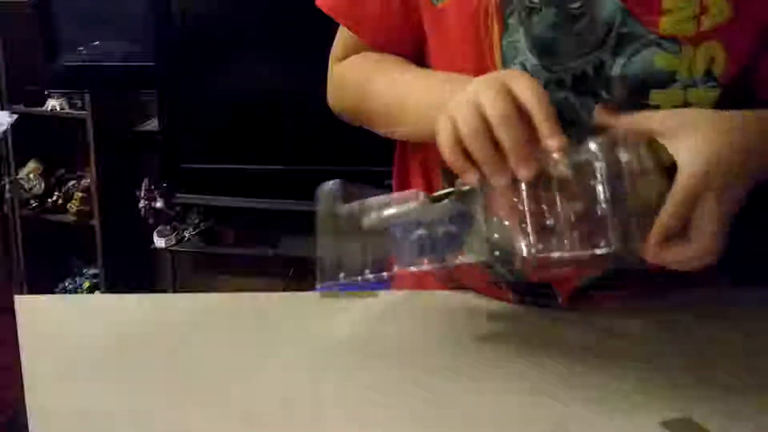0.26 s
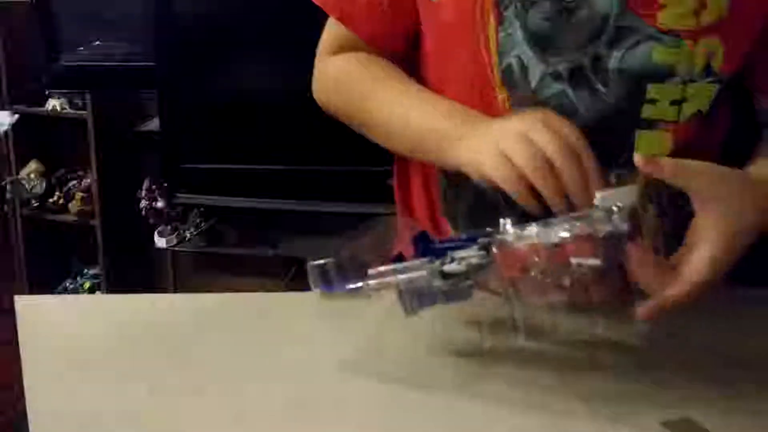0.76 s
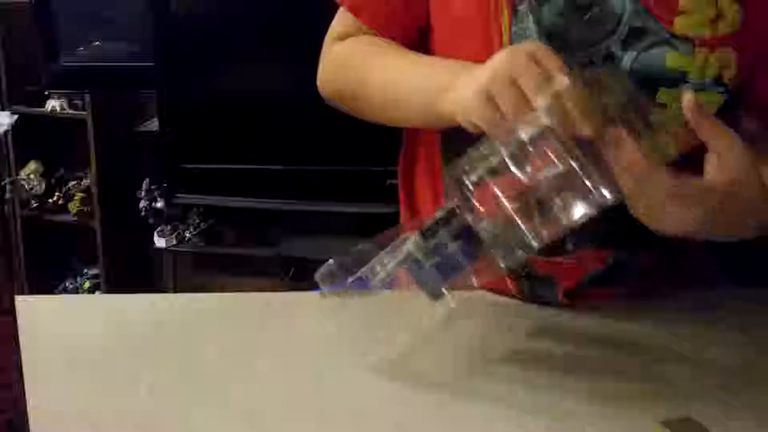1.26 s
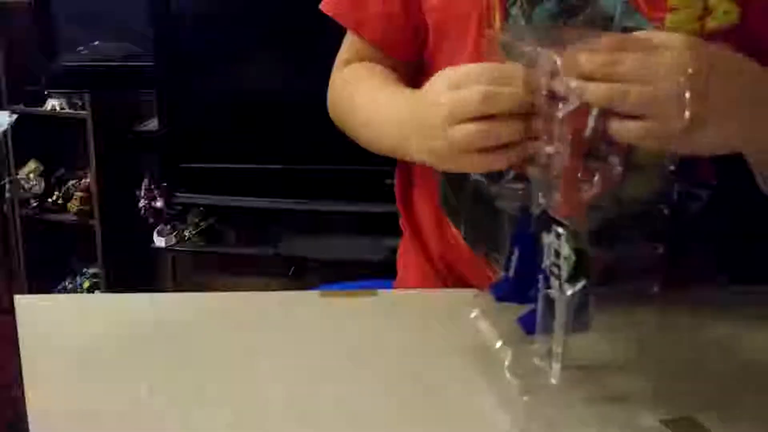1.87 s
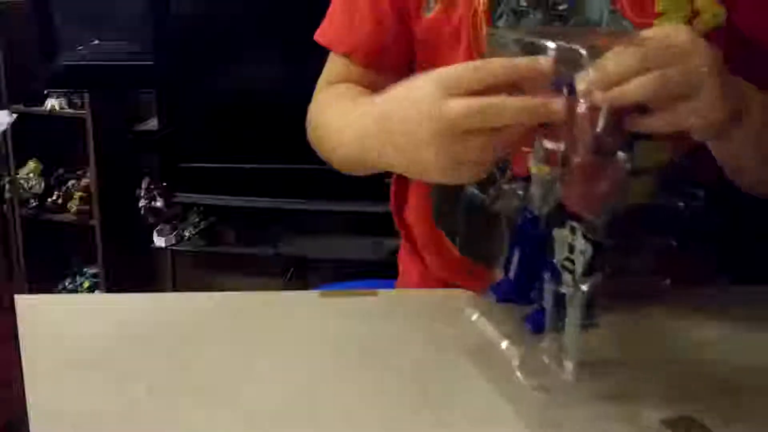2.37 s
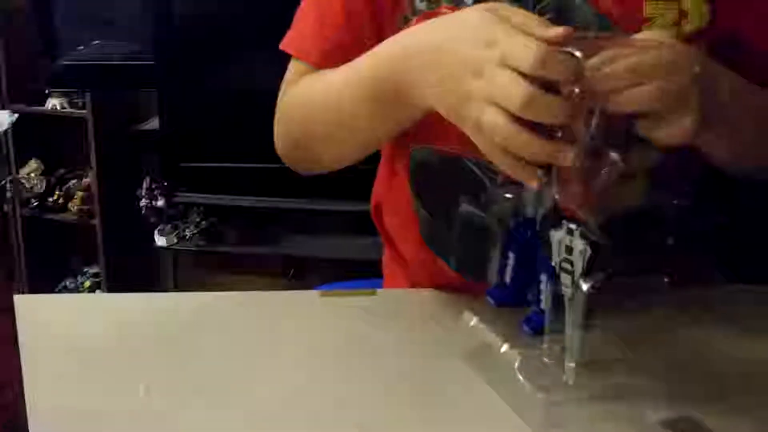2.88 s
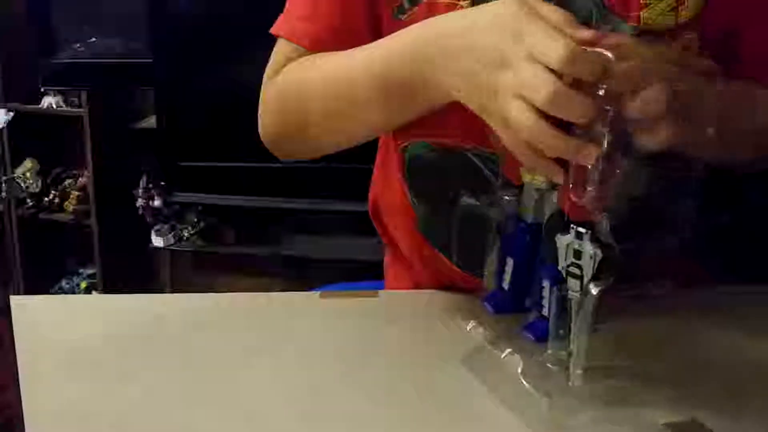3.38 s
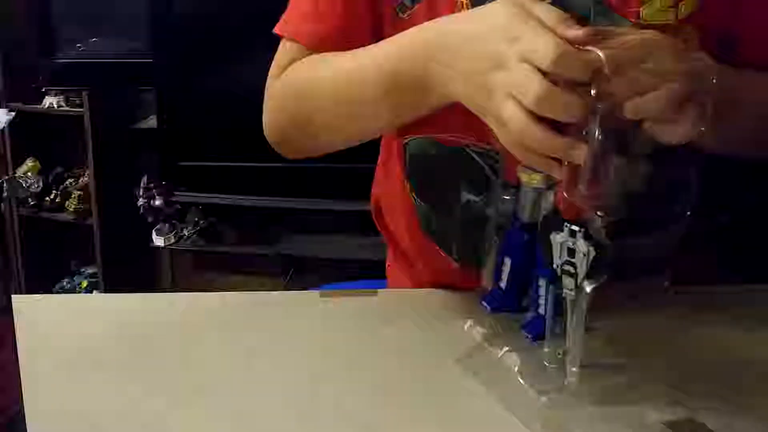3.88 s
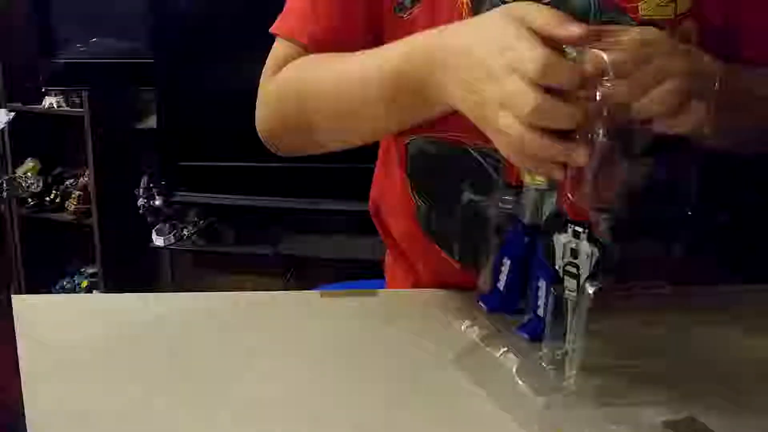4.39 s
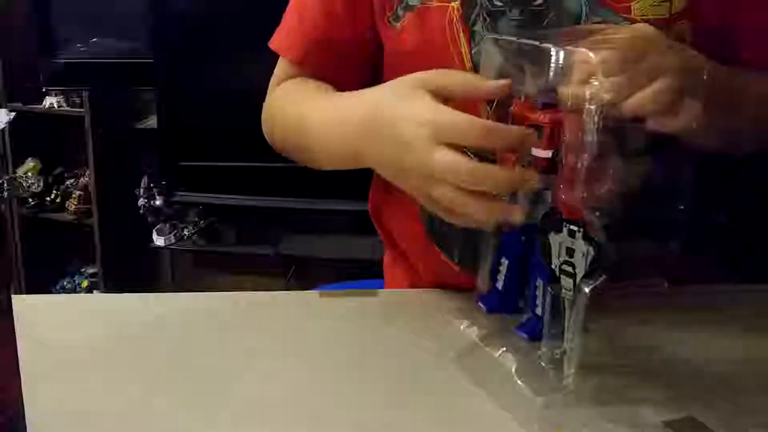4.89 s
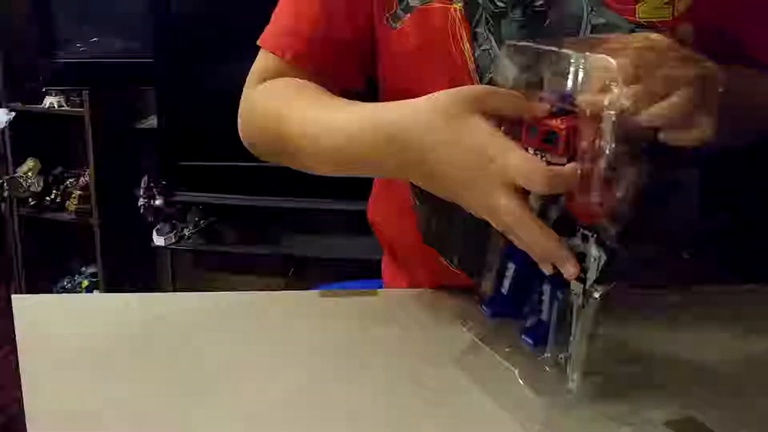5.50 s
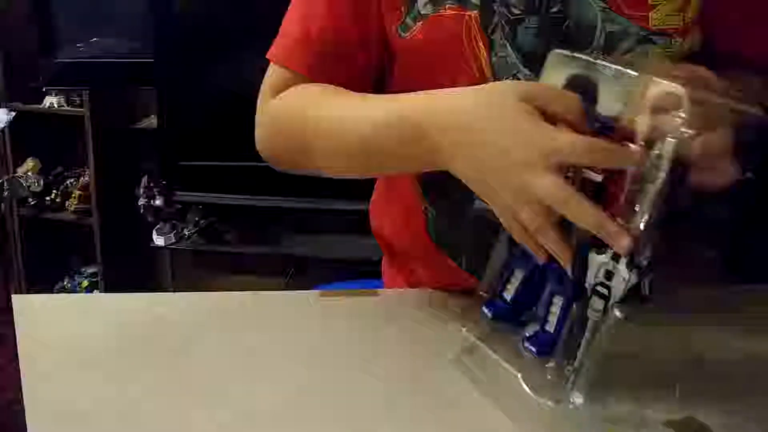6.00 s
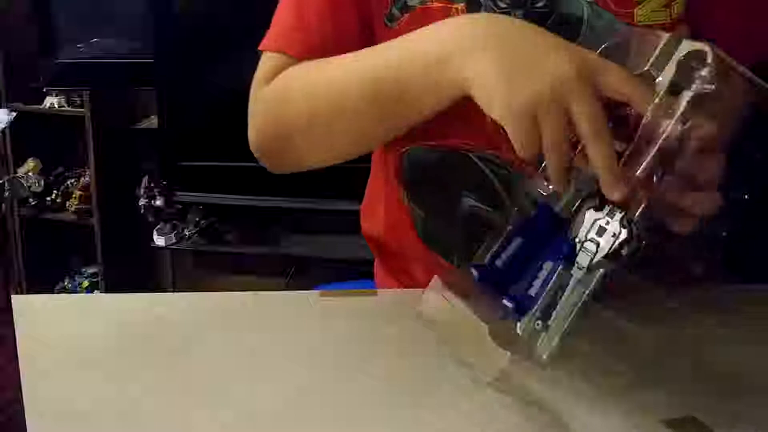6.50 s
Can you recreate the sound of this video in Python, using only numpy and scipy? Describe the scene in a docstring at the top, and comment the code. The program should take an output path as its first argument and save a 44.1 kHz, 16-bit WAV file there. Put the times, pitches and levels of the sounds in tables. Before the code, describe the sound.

Dry plastic crackling, heard close in a small furnished room with a short tail. Early pops and a hollow flop give way to light rustling and scattered ticks; a tight burst of snaps follows near the middle, then faint finger rubbing and slides. Late on, a sharp crack and wobbling panel notes precede the loudest snap, with rapid crinkles around it. The toy thuds softly inside; quiet air and hiss remain.

```python
"""A clear plastic packaging tray is flexed and turned over a table while a toy is pried out of it.
Creases buckle with sharp snaps: short noise bursts that make the sheet and nearby facets ring.
Fingers rub, squeak and pop small wrinkles; the toy rustles and bumps; wide panels flop with a hollow note.
A small living room answers with a short noise tail, over faint air and hiss.
The phone's microphone clips anything beyond full scale."""
import sys
import numpy as np
from scipy import signal
from scipy.fft import rfft, irfft, next_fast_len
from scipy.io import wavfile
from scipy.ndimage import uniform_filter1d, map_coordinates

SR = 44100
rng = np.random.default_rng(int(sys.argv[2]) if len(sys.argv) > 2 else 0)


def waveform_to_disk(signal):
    """Save audio, clipped to [-1, 1], as 16-bit WAV at the path in sys.argv[1]."""
    frames = np.transpose(np.atleast_2d(signal))
    scaled = np.clip(frames, -1, 1) * 32767
    samples = np.round(scaled).astype(np.int16)
    wavfile.write(sys.argv[1], SR, samples)


N = 297366

# All event levels are relative: band balances and the final mix still act on them.
# Brightness is in steps: below 0 is duller, above 0 is brighter.

# The tray's broad colour: f/Hz, level/dB
TRAY_COLOUR = [(35, -51), (60, -31), (160, -29.5), (217, -24), (301, -15.5), (417, 8), (579, -5.5),
               (1010, -2.5), (1140, 1.5), (3190, -4.5), (4320, -5.5), (6430, -21), (7940, -20.5),
               (12500, -40.5), (16000, -38)]
# The tray's resonances: f/Hz, width/Hz, height/dB
TRAY_RESONANCES = [(397.3, 106, -9), (4550, 2130, 3)]
# Narrow rings of the moulded shell: f/Hz
SHELL_RINGS = [715, 807, 900, 1126, 1313, 1402, 1564, 1655, 1916, 1975, 2900, 3940]
SHELL_WIDTH_HZ, SHELL_DB = 7.5, 4
# Edges of the body, mid, crack and fizz bands: f/Hz
BAND_EDGES = [70, 700, 2500, 5500, 16000]

# Fingers pressing and working the sheet: start t/s, length t/s, level/dB, brightness/steps
FINGER_STROKES = [(0, 0.16, -42, -4), (0.209, 0.066, -35, -2.5), (0.353, 0.14, -47, -2),
                  (0.524, 0.33, -40, 0), (0.912, 0.26, -43, -1), (1.718, 0.09, -38.5, 1),
                  (1.926, 0.029, -32, -3.5), (2.327, 0.065, -41.5, -1), (2.909, 0.041, -35, 6.5),
                  (3.035, 0.32, -47, -2), (3.326, 0.1, -29.5, 2), (3.457, 0.17, -42.5, 2),
                  (3.794, 0.14, -42.5, 1), (4.388, 0.21, -41.5, -0.5), (4.803, 0.029, -48, -4.5),
                  (5.028, 0.044, -44.5, -8), (5.13, 0.16, -53.5, -5.5), (5.595, 0.37, -43.5, -1),
                  (6.018, 0.4, -34.5, -1), (6.353, 0.13, -37, -8)]
# How body, mid and crack bands answer a stroke: level/dB at brightness 0, change/dB per step
STROKE_BALANCE = [(1.5, -1), (-3.5, 0.5), (-8, 0)]
STROKE_ATTACK_S = 0.005
RELEASE_S = 0.048  # letting go, for strokes and slides alike

# Creases buckling: t/s, level/dB, brightness/steps (wide panels dull, tight creases bright),
# facet ring f/Hz, extra fizz level/dB
CREASE_SNAPS = [(0.002, -41.5, 5, 4170, -8), (0.05, -44.5, 2.5, 1120, -2), (0.099, -45.5, -1.5, 1870, -5),
                (0.216, -28.5, 1, 1210, -4), (0.2289, -44, -6.5, 1280, 7), (0.359, -55.5, 8.5, 4160, -17),
                (0.413, -42.5, 4, 1560, -18), (0.499, -31.5, 7, 5100, -10.5), (0.556, -42, -1, 1220, 1),
                (0.645, -35, 0.5, 1520, 0), (0.652, -30, 2.5, 1480, -5), (0.661, -30, -1, 1250, 2.5),
                (0.671, -38, -6.5, 860, -6), (0.825, -42.5, -3, 1060, 4), (0.916, -44.5, 2, 1120, -5),
                (0.926, -43, 3, 3980, -9), (0.936, -32.5, 5, 3750, -15), (1.058, -41.5, 0.5, 784, -12),
                (1.463, -57.5, 7.5, 860, -1.5), (1.537, -59, 10.5, 3280, -13), (1.584, -46, -3, 1040, -9),
                (1.7266, -32.5, 0.5, 1880, -2.5), (1.793, -43, 3.5, 1860, -9), (1.8249, -44, 5.5, 3340, -3),
                (1.909, -47.5, -3.5, 1980, 7), (1.941, -33, 1, 2800, -3.5), (2.033, -44.5, 5, 3440, -6.5),
                (2.2848, -55.5, 2.5, 1880, -7.5), (2.326, -32.5, 2, 1430, 0.5), (2.56, -53, -2, 960, 3),
                (2.642, -51, -3.5, 1490, 1), (2.88, -52.5, 3.5, 5340, 4), (2.8941, -41.5, 4.5, 1590, -2.5),
                (2.8989, -33, 3, 1610, -7), (2.914, -31.5, 2.5, 1570, -7), (2.944, -29.5, 5.5, 3950, -3.5),
                (3.008, -50.5, 11, 3900, -18), (3.037, -33, -1, 1720, -4), (3.164, -35, 4, 5740, 1),
                (3.275, -39.5, 2.5, 2790, -1.5), (3.3162, -31.5, 0.5, 2100, -5),
                (3.3275, -25.5, 1, 2040, -5.5), (3.333, -24.5, 0.5, 1470, -1.5),
                (3.358, -26.5, 4.5, 2000, -12), (3.375, -27.5, 4, 4860, -4.5), (3.384, -37, 3, 2070, 6.5),
                (3.462, -35, 3.5, 1430, 1), (3.544, -26, 3, 1850, -9), (3.745, -64, -10, 805, -11),
                (3.832, -44.5, 5.5, 2780, -18), (3.854, -40.5, 3, 2130, -1.5), (3.944, -61.5, 6, 800, 7),
                (4.19, -41.5, 3.5, 1850, -6.5), (4.347, -45, -2.5, 1810, -7), (4.419, -39, 2, 1060, -8),
                (4.475, -31.5, 3.5, 2020, -10), (4.8105, -49.5, -2.5, 764, -3), (5.037, -52, -5.5, 840, 13),
                (5.052, -52.5, -2, 830, -6), (5.137, -51, -3, 1930, 3), (5.221, -46.5, -0.5, 3240, -27),
                (5.413, -57.5, 0.5, 1840, -24), (5.451, -53, -1, 1920, -24), (5.5756, -19, 2.5, 4490, -10),
                (5.856, -29.5, -2.5, 1360, -31), (6.012, -37, 0, 2740, -13), (6.078, -33, 2.5, 2880, -5),
                (6.103, -34, 5.5, 2850, -8), (6.183, -42, 12.5, 3800, -31), (6.294, -32.5, 4, 4070, -20),
                (6.306, -28, 5.5, 4230, -4), (6.331, -27.5, 6.5, 3600, -19), (6.3541, -30.5, 0, 3230, 5),
                (6.3862, -29, 2.5, 1150, -15), (6.3889, -15, 0.5, 1430, -14), (6.445, -32, 7, 4700, -3),
                (6.456, -29, 6, 790, -10), (6.458, -29.5, -3.5, 820, -3), (6.6361, -38.5, 7.5, 3470, -11.5)]
# How body, mid, crack and fizz bands answer a snap: level/dB at brightness 0, change/dB per step
SNAP_BALANCE = [(-7, -3), (2, -1), (-4.5, 1.0364), (-14, 2.5)]
# Fading of the snap's push in the body, mid, crack and fizz bands: t/s to fall by 17 dB
SNAP_FADES = [0.005, 0.0075, 0.0035, 0.0041]
# Steps of brightness that halve a snap's rise and run: wide panels give way slowly
QUICKEN_STEPS = 4.8
# Direct sound over room sound, and its rise per step: small facets beam at the microphone
DIRECT_DB, BEAM_DB = 2, 0.33
# The room's fading: f/Hz, time to fall by 60 dB t/s
ROOM_FADES = [(150, 0.42), (450, 0.16), (1100, 0.24), (3000, 0.21), (8000, 0.24)]

# The toy bumping inside the tray: t/s, centre f/Hz, level/dB
TOY_BUMPS = [(0.031, 253, -44), (0.216, 273, -32), (0.658, 230, -25), (1.075, 231, -37),
             (1.792, 190, -51.5), (1.951, 277, -38), (2.422, 278, -48.5), (3.331, 119, -40),
             (5.799, 171, -50), (5.857, 243, -37.5), (6.458, 217, -43)]
# Panels flopping over: t/s, settled pitch f/Hz, level/dB
PANEL_FLOPS = [(.28, 588, -26), (.658, 404, -15), (.83, 603, -33), (1.076, 396, -32), (1.305, 347, -35.5),
               (2.39, 368, -40), (3.743, 513, -37.5), (4.171, 500, -37), (4.95, 487, -38.5),
               (5.565, 412.4, -21.5), (5.803, 436, -32), (5.859, 458.4, -23), (6.389, 373.5, -22.5),
               (6.459, 472, -28), (6.653, 406, -33.5)]
# Fingertips squeaking and groaning: start t/s, end t/s, first f/Hz, last f/Hz, level/dB
FINGER_SQUEAKS = [(0.549, 0.66, 268, 245, -43.5), (1.091, 1.25, 241, 201, -51),
                  (2.094, 2.24, 403, 467, -47.5), (2.242, 2.328, 1996, 1850, -49),
                  (2.288, 2.334, 1026, 790, -53), (3.798, 4.695, 514.5, 553, -53.5)]
# The toy and palm sliding on smooth plastic: start t/s, length t/s, level/dB, brightness/steps
PLASTIC_SLIDES = [(1.083, 0.27, -35.5, 3.5), (1.395, 0.061, -35.5, 1.5), (1.603, 0.044, -39.5, 3),
                  (2.548, 0.056, -46, -4), (2.697, 0.049, -58.5, 3), (3.916, 0.18, -51, -3),
                  (4.147, 0.23, -39, 2.5), (4.86, 0.029, -48, -2), (5.194, 0.04, -50.5, -9.5),
                  (5.365, 0.31, -47, -4), (5.617, 0.98, -45, 0.5), (6.55, 0.28, -43.5, 1.5)]
# How body, mid and crack bands answer a slide: level/dB at brightness 0, change/dB per step
SLIDE_BALANCE = [(-1.5, -1), (-3, -0.5), (-9.5, 1)]
SLIDE_SWELL_S = 0.031  # a slide gathers speed gradually

TOP_HZ = 16200  # upper cutoff of the microphone


def undb(db):
    """Turn decibels into gain."""
    return 10 ** (np.asarray(db) / 20)


def unit(x):
    """Scale to an energy of one."""
    return x / np.sqrt(np.sum(x ** 2))


def along(table, hz):
    """Read (Hz, value) rows on a log-frequency axis."""
    f, value = np.transpose(table)
    return np.interp(np.log(hz + 1), np.log(f), value)


def add(out, s, x):
    """Mix x into out from time s."""
    i = max(int(s * SR), 0)
    out[i:i + len(x)] += x[:max(len(out) - i, 0)]


def bandpass(x, order, edges_hz):
    """Keep only the sound between two frequencies."""
    return signal.sosfilt(signal.butter(order, edges_hz, "band", fs=SR, output="sos"), x)


def waver(length, size=96):
    """Quick random unsteadiness with a spread of about one."""
    return np.sqrt(size) * uniform_filter1d(rng.standard_normal(length), size=size)


def quiet(air_db=-80, hiss_db=-94, sizzle_db=-88):
    """Faint room air and microphone hiss, with a thin sizzle at the top."""
    air = unit(bandpass(rng.standard_normal(N), 1, [250, 1500]))
    sizzle = unit(bandpass(rng.standard_normal(N), 2, [12500, 14000]))
    hiss = undb(hiss_db) * rng.standard_normal(N)
    return np.sqrt(N) * (undb(air_db) * air + undb(sizzle_db) * sizzle) + hiss


def sheet(lo_hz, hi_hz, size=2048):
    """The tray's response to a tap within one band: broad colour plus resonances."""
    hz = np.fft.rfftfreq(size, 1 / SR) + 1
    modes = list(TRAY_RESONANCES) + [(f, SHELL_WIDTH_HZ, SHELL_DB) for f in SHELL_RINGS]
    peaks = sum(height / (1 + (2 * (hz - f) / width) ** 2) for f, width, height in modes)
    gain = undb(along(TRAY_COLOUR, hz) + peaks)
    gain = gain / np.sqrt((1 + (lo_hz / hz) ** 12) * (1 + (hz / hi_hz) ** 12))
    # fold the cepstrum so that the response starts at once and never before the tap
    cepstrum = irfft(np.log(gain + gain.max() * 1e-4))
    cepstrum[1:size // 2] *= 2
    cepstrum[size // 2 + 1:] = 0
    return unit(irfft(np.exp(rfft(cepstrum))))


def tilted(balance, db, brightness):
    """Band levels of one event: brightness tips the common balance."""
    balance_db, db_per_step = np.transpose(balance)
    return db + balance_db + brightness * db_per_step


def pressure(t, strokes, balance, attack_s):
    """Gains of the body, mid and crack bands as strokes take hold, hold and let go."""
    power = 0
    for s, length_s, db, brightness in strokes:
        hold = np.clip((t - s) / attack_s, 0, 1)
        let_go = np.exp(-np.maximum(t - s - length_s, 0) / RELEASE_S)
        power = power + np.outer(undb(tilted(balance, db, brightness)), hold * let_go) ** 2
    return np.sqrt(power)


def wander(x, depth_db, moves_per_s=12, count=48):
    """A moving contact point drives other modes: each narrow band swells and fades on its own."""
    size = next_fast_len(N, True)
    spectrum, hz = rfft(x, size), np.fft.rfftfreq(size, 1 / SR)
    centres = np.geomspace(BAND_EDGES[0], BAND_EDGES[-1], count)
    position = np.arange(N) / SR * moves_per_s
    out = 0
    for share in np.eye(count):
        walk = map_coordinates(rng.standard_normal(SR // 100), [position], order=1)
        narrow = irfft(spectrum * along(np.c_[centres, share], hz), size)[:N]
        out = out + undb(depth_db * np.minimum(walk, 1)) * narrow
    return out


def friction(slips_per_s, spread_db, hiss_db, patchy_db):
    """Catch and slip: many small ticks over a smooth hiss."""
    happens = rng.random(N) < slips_per_s / SR
    size_db = spread_db * np.minimum(rng.exponential(size=N), 4)
    slips = happens * undb(size_db) * rng.choice([-1, 1], N)
    force = unit(slips) + undb(hiss_db) * unit(rng.standard_normal(N))
    return np.sqrt(N) * unit(wander(force, patchy_db))


def driven(bands, force, strokes, balance, attack_s, fizz_db):
    """A rubbing force, shaped by the hand's pressure, sounds through the bands of the sheet."""
    t = np.arange(N) / SR
    coarse = t[::64]  # pressure changes slowly enough to compute sparsely
    gains = [np.interp(t, coarse, gain) for gain in pressure(coarse, strokes, balance, attack_s)]
    gains.append(gains[-1] * undb(fizz_db))  # the fizz follows the crack band
    return sum(gain * signal.oaconvolve(force, band)[:N] for band, gain in zip(bands, gains))


def rubbing(bands):
    """Fingers catch and slip on the sheet: a coarse, uneven crinkle."""
    force = friction(slips_per_s=300, spread_db=3.0, hiss_db=-8.5, patchy_db=5.0)
    force = wander(force, depth_db=3.5, moves_per_s=20, count=16)
    force = np.sqrt(N) * unit(force)
    return driven(bands, force, FINGER_STROKES, STROKE_BALANCE, STROKE_ATTACK_S, fizz_db=-18.5)


def facet(t, hz, q=11.0, ring_db=7):
    """The facet beside a crease rings for a few cycles and colours its sound."""
    decay = np.pi * hz / q
    response = undb(ring_db) * 2 * decay / SR * np.cos(2 * np.pi * hz * t) * np.exp(-decay * t)
    response[0] += 1  # the push itself passes straight through
    return response


def wrinkles(bands, per_s=40, level_db=-5, spread_db=1.5, brightness=1, fade_s=0.0055):
    """Small wrinkles pop at random, as loud as the hand presses, each with its own facet."""
    t = np.arange(SR // 50) / SR
    out = np.zeros(N)
    step_s = 0.002
    times = np.arange(0, N / SR, step_s)
    chance, size = rng.random(len(times)), rng.standard_normal(len(times))
    levels = tilted(SNAP_BALANCE, level_db, brightness)
    response = sum(undb(db) * band for db, band in zip(levels, bands))
    mid_pressure = pressure(times, FINGER_STROKES, STROKE_BALANCE, STROKE_ATTACK_S)[1]
    strength = mid_pressure * undb(spread_db * size) * np.sqrt(SR / 100)
    pops = chance < per_s * step_s
    for s, gain in zip(times[pops], strength[pops]):
        noise = rng.standard_normal(len(t)) * np.exp(-t / fade_s)
        push = signal.fftconvolve(noise, facet(t, rng.uniform(BAND_EDGES[1], BAND_EDGES[3])))
        add(out, s, gain * signal.fftconvolve(unit(push), response))
    return out


def burst(envelope, evenness=0.33, size=32, count=2):
    """A dry crack: noise following the envelope, with its spectrum's peaks and gaps partly evened."""
    x = envelope * rng.standard_normal(len(envelope))
    for _ in range(count):
        spectrum = rfft(x)
        flat = irfft(spectrum / np.abs(spectrum) ** evenness, len(x))
        loudness = np.sqrt(np.abs(uniform_filter1d(flat ** 2, size)) + 1e-12)
        x = flat * envelope / loudness
    return x


def room(gap_s=0.001, build_s=0.0016, early_s=0.03, size=16384):
    """Table and chest reflect unevenly first, then the walls blur into a tail, longest in the bass."""
    t, hz = np.arange(size) / SR, np.fft.rfftfreq(size, 1 / SR)
    unevenness = np.abs(rng.standard_normal(size)) ** np.exp(-t / early_s)
    echoes = rfft(rng.standard_normal(size) * unevenness)
    onset = 1 - np.exp(-np.maximum(t - gap_s, 0) / build_s)
    centres, t60s = np.transpose(ROOM_FADES)
    tail = 0
    for t60, share in zip(t60s, np.eye(len(ROOM_FADES))):
        fade = unit(onset * np.exp(-np.log(1000) * t / t60))
        tail = tail + irfft(echoes * along(np.c_[centres, share], hz)) * fade
    return unit(tail)


def snaps(bands, rise_s=0.00047, run_s=0.0021, after_db=-14, after_s=0.0084, size=2048):
    """A crease runs for a moment, the sheet rings out, and tiny wrinkles follow."""
    t = np.arange(size) / SR
    out = np.zeros(N)
    for s, level_db, brightness, facet_hz, fizz_db in CREASE_SNAPS:
        slow = 2 ** (-brightness / QUICKEN_STEPS)
        rise = (1 - np.exp(-t / (rise_s * slow))) ** 2
        after = undb(after_db) * np.exp(-t / after_s)
        colour, crack = facet(t, facet_hz), 0
        levels = tilted(SNAP_BALANCE, level_db, brightness)
        levels[-1] += fizz_db
        for band, db, fade_s in zip(bands, levels, SNAP_FADES):
            run = np.exp(-np.maximum(t - run_s * slow, 0) / (fade_s / 2))
            push = burst(rise * np.hypot(run, after))
            ringing = signal.fftconvolve(signal.fftconvolve(push, colour), band)
            crack = crack + undb(db) * unit(ringing)
        crack = crack * np.sqrt(SR / 100)  # energy as if spread over a hundredth of a second
        add(out, s, undb(DIRECT_DB + BEAM_DB * brightness) * crack)
        # the tray keeps moving, so each snap meets the walls by other paths
        add(out, s, signal.fftconvolve(crack, room()))
    return out


def bumps(spread=1.276, fade_s=0.015):
    """The toy knocks against the tray: a short, rough thud with no clear pitch."""
    t = np.arange(SR // 5) / SR
    out = np.zeros(N)
    for s, hz, db in TOY_BUMPS:
        thud = bandpass(burst(np.exp(-t / fade_s)), 3, [hz / spread, hz * spread])
        add(out, s, undb(db) * np.sqrt(SR * fade_s) * unit(thud))
    return out


def flops(rise_s=0.0022, swing_s=0.021, sag=0.023, rough=0.065, overtone_db=-10):
    """A wide panel swings for a few cycles; its note sags, and the stiffening sheet adds overtones."""
    t = np.arange(SR // 5) / SR
    out = np.zeros(N)
    for s, hz, db in PANEL_FLOPS:
        pitch = hz * (1 + sag * np.exp(-t / swing_s) + rough * waver(len(t)))
        phase = 2 * np.pi * np.cumsum(pitch) / SR
        note = sum(undb(overtone_db * k) * np.sin((k + 1) * phase) for k in range(3))
        swing = (1 - np.exp(-t / rise_s)) * np.exp(-(t / swing_s) ** 2)
        add(out, s, np.sqrt(2) * undb(db) * note * swing)
    return out


def squeak(jitter=3.8):
    """Uneven stick-slip gives broken, gliding tones: low rough groans and high thin squeaks."""
    out = np.zeros(N)
    for start, end, first_hz, last_hz, db in FINGER_SQUEAKS:
        size = int((end - start) * SR)
        glide = np.linspace(first_hz, last_hz, size)
        hz = glide + jitter * np.sqrt(glide) * waver(size)
        grip = np.hanning(size) * np.abs(1 + .5 * waver(size, size=256))
        add(out, start, 2 * undb(db) * grip * np.sin(2 * np.pi * np.cumsum(hz) / SR))
    return out


def sliding(bands, low_hz=320, top_hz=9500):
    """Sliding without buckling: a fine, bright rustle that swells, with little bass."""
    force = friction(slips_per_s=560, spread_db=0.5, hiss_db=-6, patchy_db=5.0)
    rustle = driven(bands, force, PLASTIC_SLIDES, SLIDE_BALANCE, SLIDE_SWELL_S, fizz_db=-13.5)
    return bandpass(rustle, 3, [low_hz, top_hz])


def scene():
    """Mix every source, heard directly and through the room, over the quiet background."""
    bands = [sheet(lo, hi) for lo, hi in zip(BAND_EDGES, BAND_EDGES[1:])]
    background = quiet()
    hands = rubbing(bands) + wrinkles(bands) + squeak() + sliding(bands)
    cracks = snaps(bands)  # these already include their room sound
    knocks = bumps() + flops()
    near = undb(-4.5) * hands + knocks
    far = signal.fftconvolve(undb(-9.0) * hands + undb(-4.5) * knocks, room())[:N]
    return (cracks + near + far + background)[None]


def record(dry, low_hz=70):
    """The microphone clips at full scale; then rumble and the extreme treble are cut."""
    clipped = np.clip(dry, -1, 1)
    no_rumble = signal.sosfilt(signal.butter(2, low_hz, "high", fs=SR, output="sos"), clipped)
    return signal.sosfilt(signal.ellip(8, .2, 70, TOP_HZ, fs=SR, output="sos"), no_rumble)


dry = scene()
out = record(dry)
waveform_to_disk(out)
```